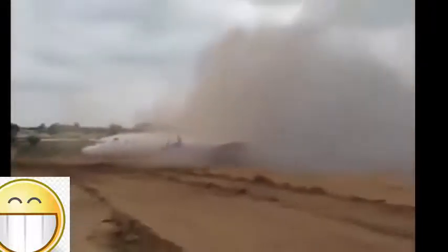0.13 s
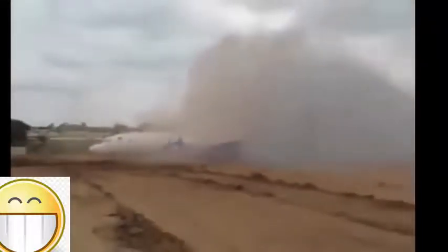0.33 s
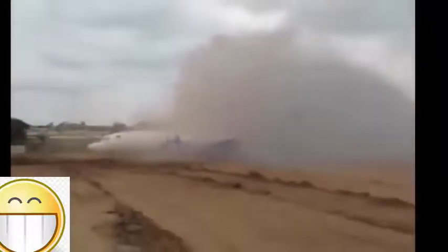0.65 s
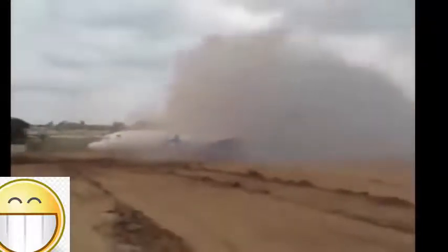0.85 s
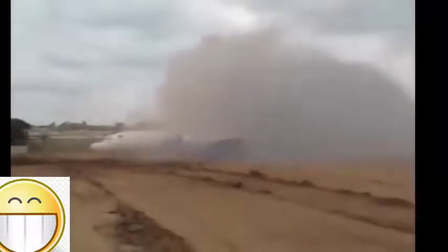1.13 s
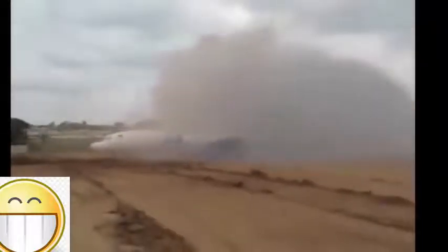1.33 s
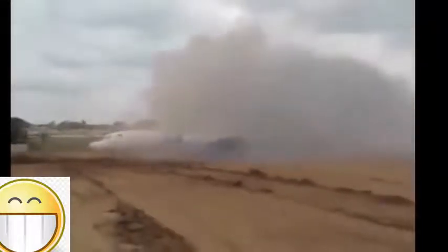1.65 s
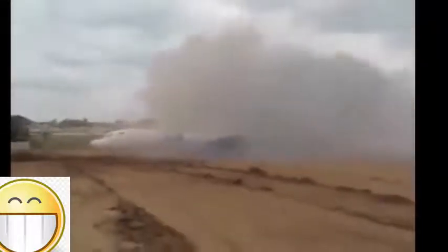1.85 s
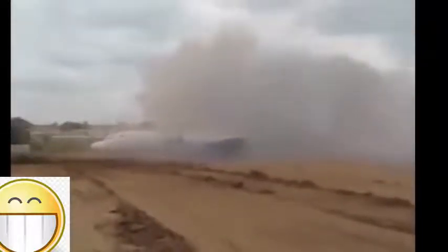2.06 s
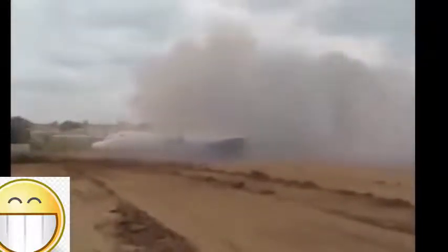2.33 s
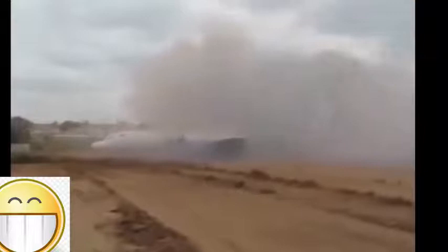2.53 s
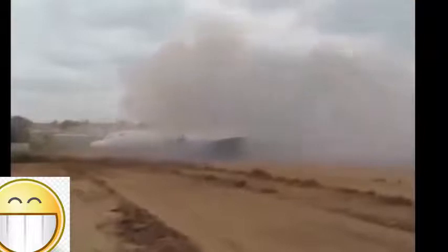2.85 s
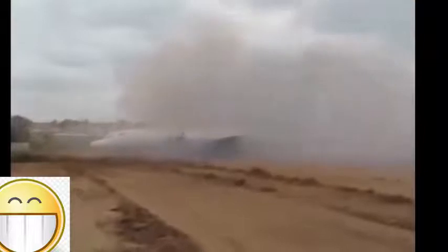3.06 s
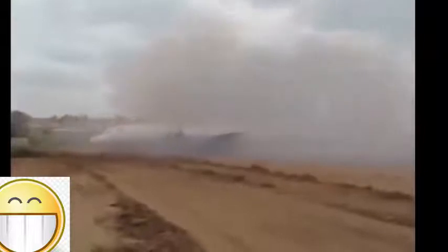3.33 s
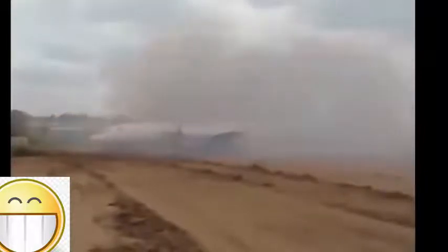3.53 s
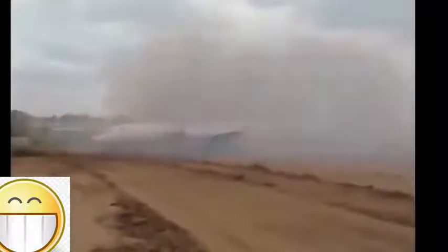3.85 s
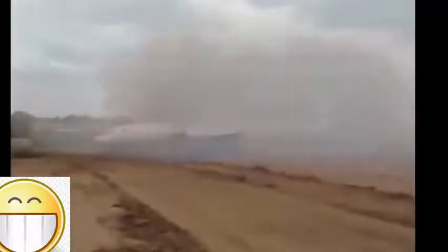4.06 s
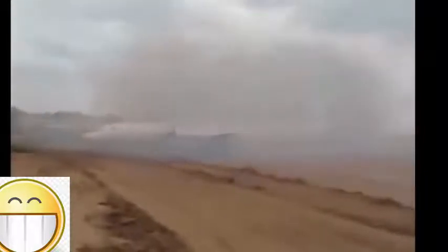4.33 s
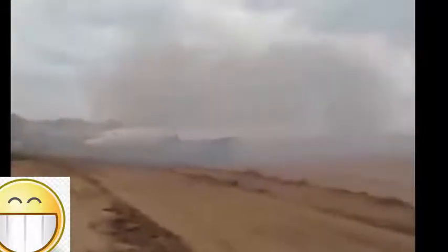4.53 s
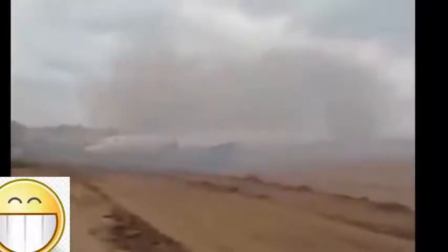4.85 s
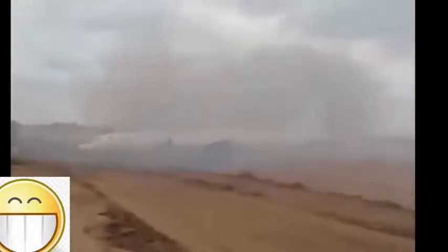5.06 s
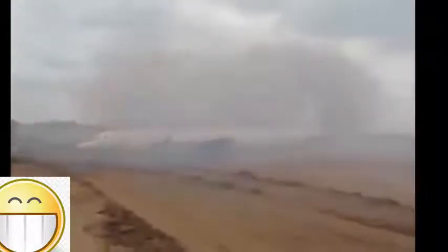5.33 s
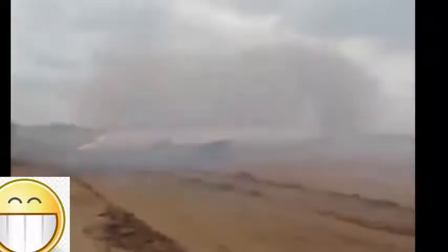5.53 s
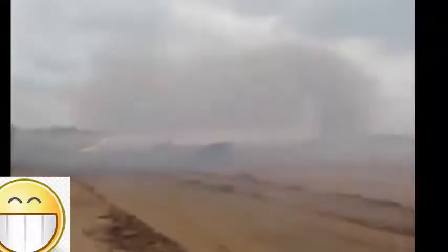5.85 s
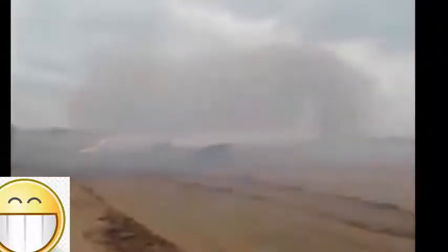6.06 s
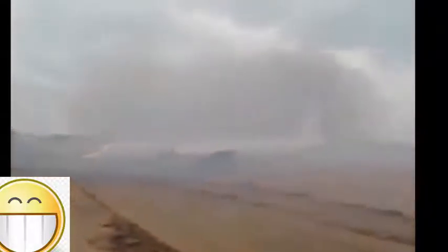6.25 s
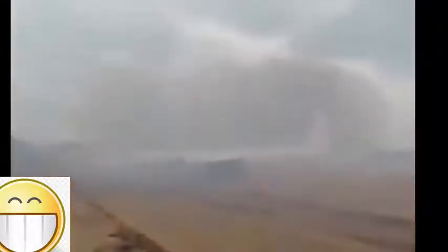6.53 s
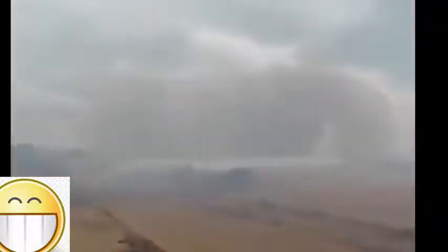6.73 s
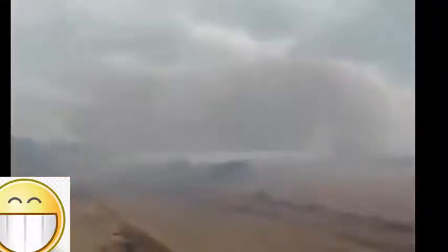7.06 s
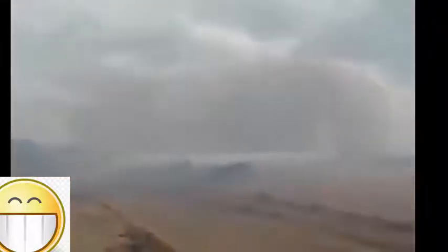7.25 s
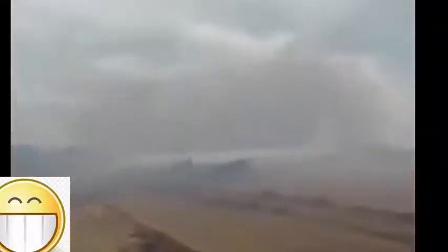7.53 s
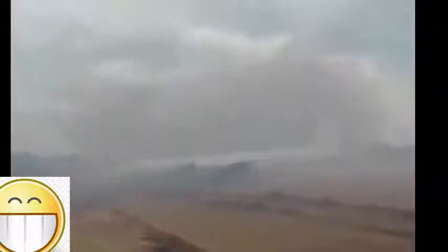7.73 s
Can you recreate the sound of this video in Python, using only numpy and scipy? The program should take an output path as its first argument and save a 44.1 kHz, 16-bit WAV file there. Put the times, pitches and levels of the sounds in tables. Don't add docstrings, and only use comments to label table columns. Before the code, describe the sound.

Distant jet engines wind down over nearly eight seconds in an open field, heard in stereo from about a hundred metres. From 0 s a dense rushing exhaust noise fills the scene, with a deep hum throbbing roughly twice a second and several thin, high turbine whines. Through 1-3 s the hum sinks and weakens, and the main whine glides down, wavering and blurred by the air. Around 3.5 and 4.3 s the rush swells; near 5.2 s it dips clearly, with quick treble flutters up to about 6 s. Other faint whines surface and fall, some high and hissy, some midrange, and a soft low one appears after 5.3 s. From 6 to 7.9 s the hum is almost lost, while the rush and descending whines continue, dipping again near 7.6 s. The sound is airy, gritty and slightly hollow from ground reflections, and the engines are still running at the end.

```python
import sys
import numpy as np
from scipy import signal
from scipy.io import wavfile
from scipy.ndimage import uniform_filter1d

SR = 44100
rng = np.random.default_rng(int(sys.argv[2]) if len(sys.argv) > 2 else 0)


def materialize(psi):
    bounded = np.clip(np.atleast_2d(psi).T, -1, 1)
    quanta = np.round(bounded * 32767).astype(np.int16)
    wavfile.write(sys.argv[1], SR, quanta)


def linear_from_db(decibels):
    return 10 ** (np.asarray(decibels, float) / 20)


N = 347949
TIME = np.arange(N) / SR

# columns t/s, lift of the lows/dB, left minus right/dB
DUST_CLOUD = [(0, 3, 1), (.5, 0.5, -3), (1.2, 0, -1.5), (2.1, -1, -1.5), (2.6, 0.5, -2), (4.9, -2, -1.6),
              (5.3, 1, -1.5), (5.7, 0.9, -1.5), (6.1, 3, -2.2), (6.45, 0.5, -1.8), (6.9, 3.5, -3.5),
              (7.3, 1, -5), (7.6, -0.5, -4), (7.89, -0.5, -5)]
# columns f/Hz, phase/rad
LEFT_LEAD = [(100, 0), (1700, -.08), (2760, -.4), (3880, 0), (5430, -.3), (10800, .1)]


def colour(hz, points):
    f, value = np.transpose(points)
    return np.interp(np.log(hz + 1), np.log(f + 1), value)


def drift(shape, size):
    x = rng.standard_normal(shape)
    for axis, length in enumerate(size):
        for _ in range(2):
            x = uniform_filter1d(x, length, axis=axis)
    return x / x.std()


def tone(hz, db, width_hz, steady):
    size = (int(SR / width_hz / 2),)
    wander = (drift(len(hz), size) + 1j * drift(len(hz), size)) / np.sqrt(2)
    steady = np.clip(steady, 0, 1)
    smeared = np.sqrt(steady) + np.sqrt(1 - steady) * wander
    turn = np.exp(2j * np.pi * np.cumsum(hz) / SR)
    return np.sqrt(2) * linear_from_db(db) * smeared * turn


def ports(z, pan_db, lead):
    left = z * linear_from_db(pan_db / 2) * np.exp(.5j * lead)
    right = z * linear_from_db(-pan_db / 2) * np.exp(-.5j * lead)
    return np.real([left, right])


def gusts(t):
    # columns t/s, half length/s, level/dB, extra in the treble/dB
    gust_table = [(0.296, 0.093, -2, 1.5), (1.14, 0.083, -0.9, -1.1), (1.64, 0.13, 0.8, 0.2),
                  (1.808, 0.044, 1.35, 0.1), (1.989, 0.06, -1, -1.9), (2.112, 0.04, 0.5, 2.3),
                  (2.383, 0.12, -2.3, 2.1), (2.596, 0.03, 2.3, 3.1), (2.802, 0.045, -3, 0),
                  (3.164, 0.04, 0.8, -3.5), (3.525, 0.13, 3, -1), (3.773, 0.06, -2.5, -1),
                  (4.273, 0.06, 4, -2.1), (4.668, 0.073, -2.5, -1.5), (4.846, 0.054, 0.5, 2.3),
                  (5.031, 0.043, -3, 2), (5.189, 0.15, -6.5, 2.5), (5.374, 0.039, -1.5, -1.0),
                  (5.635, 0.078, -2.85, 4.5), (5.826, 0.072, -4.5, 1.1), (6.02, 0.048, 2.25, 3),
                  (6.112, 0.055, -2.5, -3), (6.759, 0.074, -0.5, -4.5), (7.008, 0.04, 1.1, 0.5),
                  (7.426, 0.045, -0.1, -3.0), (7.593, 0.13, -7, 1.3), (7.683, 0.04, 0, 4.5),
                  (7.864, 0.065, -2.7, -1.5)]
    s, half, db, treble_db = np.transpose(gust_table)
    bells = np.exp(-.5 * ((t[:, None] - s) / half) ** 2)
    return bells @ db, bells @ treble_db


def hum():
    # columns t/s, f/Hz
    fan = [(0, 86.5), (.25, 84), (.5, 79.5), (1, 71.5), (1.5, 66.5), (2, 59), (2.5, 57), (3, 52), (3.5, 49),
           (4, 48), (5, 44), (6, 40), (7, 34), (7.89, 32.5)]
    # columns t/s, level/dB
    hum_octave = [(0, -31), (.5, -33), (1, -37), (1.5, -37), (2.2, -38), (2.6, -50), (7.89, -58)]
    # columns t/s, f/Hz, level/dB
    far_fan = [
        (0, 53.2, -40),
        (.6, 50, -35),
        (1.5, 46.3, -48),
        (2.5, 39.2, -61),
    ]
    # columns t/s of a trough, level of the swell after it/dB
    beats = [(-.25, -17.5), (.4, -23.5), (.87, -21), (1.5, -23.5), (1.9, -26), (2.26, -25), (2.74, -29),
             (3.08, -26), (3.56, -35.5), (4.01, -28.5), (4.39, -32), (4.77, -32), (5.08, -36), (5.4, -35),
             (5.73, -36), (6.11, -38.5), (6.45, -35.5), (6.8, -39.5), (7.14, -38), (7.47, -33), (7.95, -43)]
    # columns t/s, size (share 0-1)
    twin_size = [
        (1.5, 0.44),
        (1.9, .85),
    ]

    hz = np.interp(TIME, *np.transpose(fan))
    s, swell_db = np.transpose(beats)
    twin = np.clip(np.interp(TIME, *np.transpose(twin_size)), 0, 1)
    beat_turns = np.interp(TIME, s, np.arange(len(s)))
    beat = (1 - twin * np.exp(-2j * np.pi * beat_turns)) / (1 + twin)
    near_db = np.interp(TIME, (s[1:] + s[:-1]) / 2, swell_db[:-1])
    near = beat * tone(hz, near_db, width_hz=3.0, steady=0.99)

    octave_db = np.interp(TIME, *np.transpose(hum_octave))
    octave = tone(2 * hz, octave_db, width_hz=3.0, steady=.96)

    s, far_hz, far_db = np.transpose(far_fan)
    far_level_db = np.interp(TIME, s, far_db, right=-99)
    far = tone(np.interp(TIME, s, far_hz), far_level_db, width_hz=3.0, steady=1.0)
    return ports(near + octave + far, pan_db=-.4, lead=.3)


def rush():
    # columns f/Hz, level/dB per Hz
    fast_colour = [(25, -14), (50, -6.5), (100, -4.5), (200, -8.5), (400, -15), (740, -17), (1500, -15.5),
                   (2500, -14.5), (3300, -10), (4300, -11.5), (6000, -17.5), (8500, -19), (10000, -21),
                   (11200, -28.5)]
    # columns f/Hz, level/dB per Hz
    slow_colour = [(25, -3), (45, -5), (90, -2.5), (165, 0.5), (250, -8), (445, -11), (800, -5.5),
                   (1500, -5.5), (2500, -2.5), (3500, -3.5), (5400, -10.5), (7000, -11), (8500, -16),
                   (11200, -22)]
    # columns f/Hz, width/Hz, depth/dB
    notches = [(520, 90, -4), (1120, 55, -6), (1850, 120, -2), (4200, 250, -1.5), (5900, 400, -2)]
    # columns f/Hz, level/dB
    apart_level = [(40, -7), (150, -13.5), (400, -15.5), (1100, -10.5), (2000, -10.5), (3200, -11),
                   (4000, -13), (6000, -5.5), (10000, -6.5)]
    # columns centre f/Hz, start level/dB, trend/dB per s, share of gusts, share of cloud's lift
    regions = [
        (213, -35.5, -0.16, 0.085, 1.01),
        (1084, -35, 0.3848, 0.3, .3),
        (2823, -26.5, 0.61, .98, 0.013),
        (7206, -30, -.5, 0.99, 0.024),
    ]
    # columns f at high speed/Hz, f at low speed/Hz, width/Hz, depth/dB
    valley = (2451, 1749, 301, -1.5)

    hz, t, (both, apart) = signal.stft(rng.standard_normal((2, N)), SR, nperseg=1024)
    s, lift_db, pan_db = np.transpose(DUST_CLOUD)
    gust_db, treble_db = gusts(t)
    slowed = np.clip((t - 1.2) / 5.07, -.2, 1.2)
    db = np.outer(colour(hz, fast_colour), 1 - slowed) + np.outer(colour(hz, slow_colour), slowed)

    for f, width, depth_db in notches:
        notch_hz = f * (1 + 0.018 * drift(len(t), (40,)))
        db += depth_db * np.exp(-.5 * ((hz[:, None] - notch_hz) / width) ** 2)
    fast_hz, slow_hz, width, depth_db = valley
    valley_hz = fast_hz + (slow_hz - fast_hz) * slowed
    db += depth_db * np.exp(-.5 * ((hz[:, None] - valley_hz) / width) ** 2)

    db += 1.1 * drift(db.shape, (7, 12)) * np.clip(hz / 2500, 0, 1)[:, None]
    db += 1.0 * drift(db.shape, (120, 4)) * np.clip(hz / 3000, 0, 1)[:, None]

    place = np.interp(np.log(hz + 1), np.log(np.transpose(regions)[0]), np.arange(len(regions)))
    for k, (centre_hz, start_db, trend_db, gusty, cloudy) in enumerate(regions):
        share = np.clip(1 - np.abs(place - k), 0, 1)[:, None]
        near = np.abs(np.log2((hz + 1) / centre_hz)) < .6
        level_db = start_db + trend_db * t + gusty * gust_db + cloudy * np.interp(t, s, lift_db)
        level_db += 1.07 * drift(len(t), (3,))
        if k == len(regions) - 1:
            level_db += treble_db
        own_db = 10 * np.log10(np.sum(linear_from_db(2 * db[near]), axis=0) / len(hz))
        db = db + share * (level_db - uniform_filter1d(own_db, size=9))

    def above(corner_hz):
        return np.outer(np.clip((hz - corner_hz) / 600, 0, 1), slowed)

    db = db - 1.5 * above(8300)
    apart = apart * linear_from_db(colour(hz, apart_level)[:, None] - 3 * above(6340))
    pan_band = np.exp(-.5 * ((hz - 3050) / 650) ** 2)
    tilt_db = np.outer(pan_band, np.interp(t, s, pan_db) + 1.1 * drift(len(t), (4,)))
    lead = np.exp(.5j * colour(hz, LEFT_LEAD))[:, None]
    left = both * linear_from_db(tilt_db / 2) * lead + apart
    right = both * linear_from_db(-tilt_db / 2) / lead - apart
    return signal.istft(linear_from_db(db) * np.array([left, right]), SR, nperseg=1024)[1][:, :N]


def whine(stages, core_db):
    fade_s, gust_share = .15, .6
    out = np.zeros((2, N))
    step = TIME[::64]
    gust_db = gust_share * np.interp(TIME, step, gusts(step)[0])
    cloud_s, _, cloud_pan_db = np.transpose(DUST_CLOUD)
    pan_db = np.interp(TIME, cloud_s, cloud_pan_db)
    for start, end, start_hz, end_hz, db in stages:
        now = (TIME > start) & (TIME < end)
        t = TIME[now]
        hz = (start_hz + end_hz) / 2
        fade = np.clip(np.minimum(t - start, end - t) / fade_s, 0, 1)
        pitch = np.interp(t, [start, end], [start_hz, end_hz])
        level_db = db + gust_db[now]
        thin_db = core_db - 9 * (hz > 6000)
        skirt = np.sqrt(1 - linear_from_db(2 * thin_db)) * tone(pitch, level_db, width_hz=.035 * hz, steady=0)
        core = tone(pitch, level_db + thin_db + 1, width_hz=.005 * hz, steady=.45)
        out[:, now] += ports(fade * (skirt + core), 1.5 * pan_db[now], colour(hz, LEFT_LEAD))
    return out


def clear_whine():
    clear_stages = [(-.1, .4, 4010, 3760, -32), (.5, 1.05, 3710, 3490, -34), (1.2, 2.0, 3420, 3090, -32),
                    (2.2, 2.75, 3010, 2790, -41), (2.9, 4.0, 2740, 2370, -38), (4.0, 5.0, 2370, 2120, -42),
                    (-.1, .4, 4900, 4680, -33), (.5, 1.1, 4620, 4330, -39), (3.3, 3.8, 3290, 3120, -33),
                    (4.8, 5.7, 4950, 4610, -43), (5.7, 6.7, 4610, 4250, -41), (6.3, 6.85, 3700, 3560, -39),
                    (6.75, 8.0, 3590, 3285, -34), (6.0, 7.1, 2170, 1930, -37)]
    return whine(clear_stages, core_db=-2.5)


def smeared_whine():
    smeared_stages = [(1.9, 2.35, 4170, 3920, -31), (2.45, 2.85, 3700, 3530, -35),
                      (3.8, 4.5, 3200, 3200, -36), (-.1, .8, 8370, 7500, -41.5),
                      (3.8, 5.3, 8300, 7370, -42.5), (5.35, 5.9, 7510, 7250, -36.5),
                      (5.9, 6.5, 7020, 6750, -44.5), (7.0, 8.0, 2475, 2240, -36),
                      (3.0, 3.9, 3760, 3546, -36), (4.1, 5.0, 3520, 3432, -34.5),
                      (5.3, 6.7, 952, 903, -43.5), (6.65, 7.3, 908, 830, -41.5), (7.3, 8.0, 834, 720, -41)]
    return whine(smeared_stages, core_db=-7)


def scene():
    return hum() + rush() + clear_whine() + smeared_whine()


def top_cut(x):
    return signal.sosfilt(signal.butter(12, 11160, fs=SR, output="sos"), x)


def record(dry):
    return top_cut(dry)


dry = scene()
out = record(dry)
materialize(out)
```